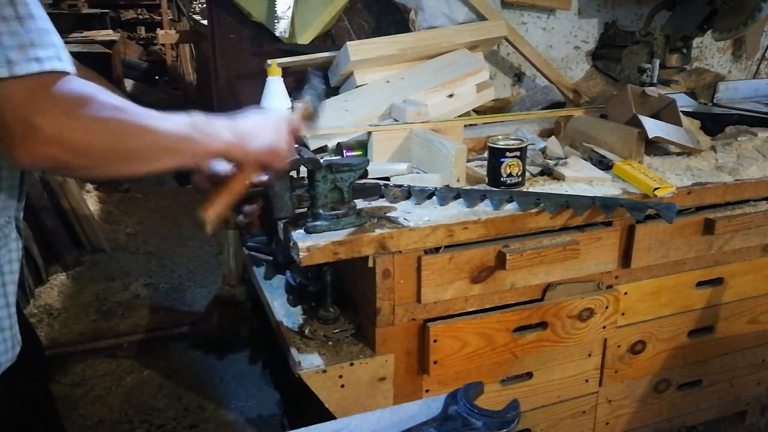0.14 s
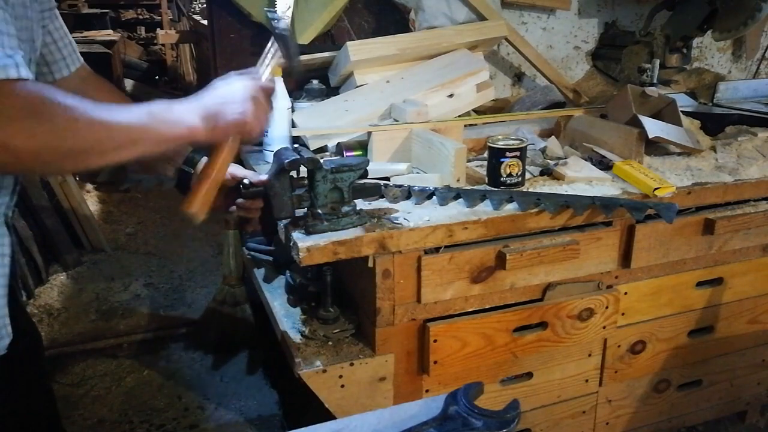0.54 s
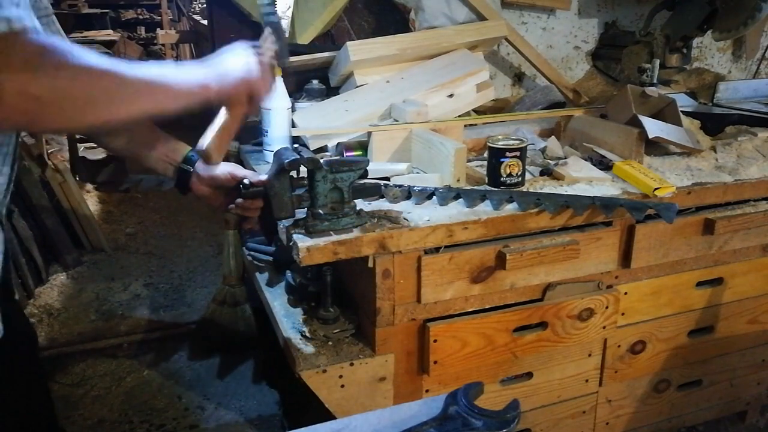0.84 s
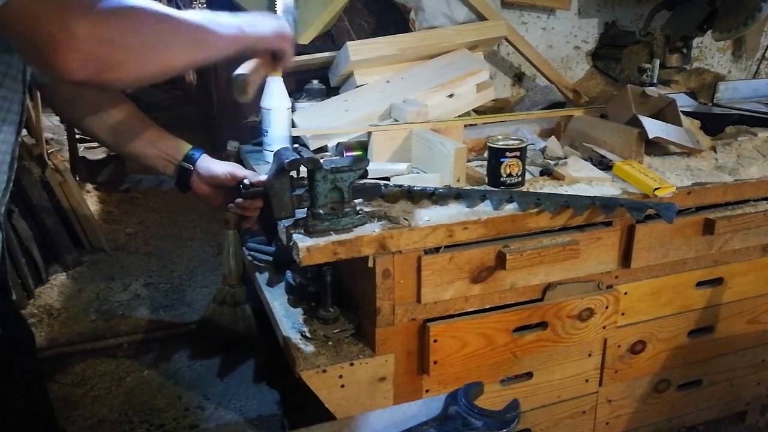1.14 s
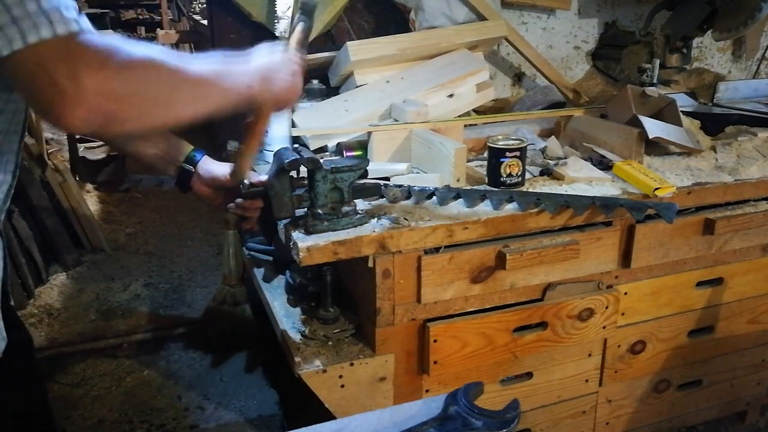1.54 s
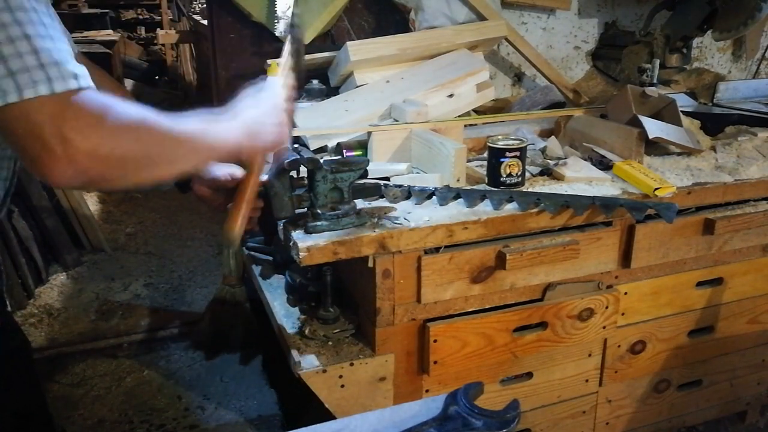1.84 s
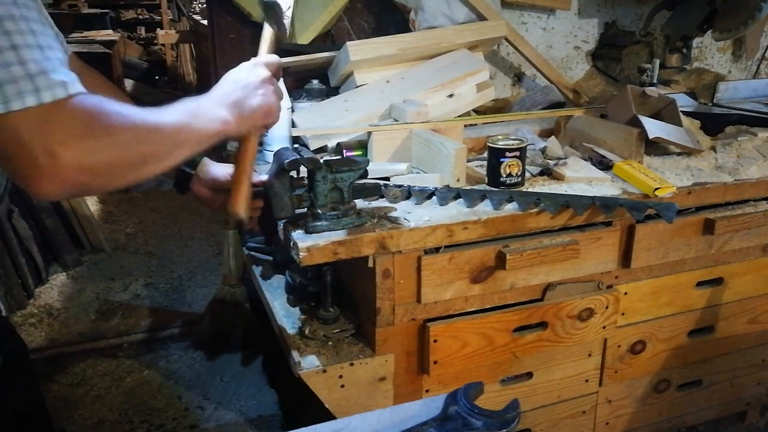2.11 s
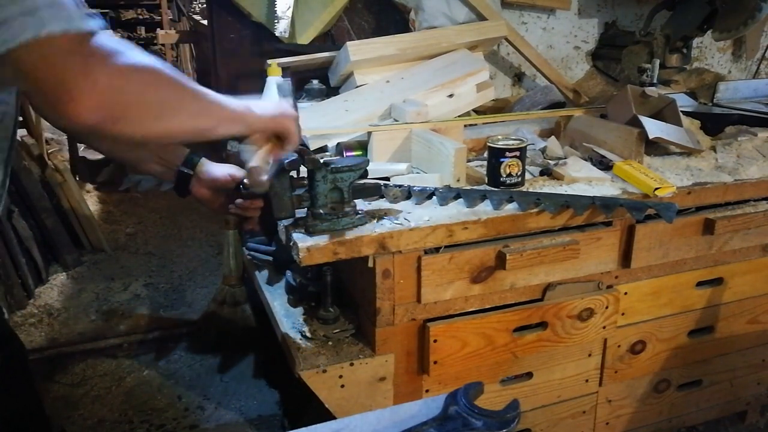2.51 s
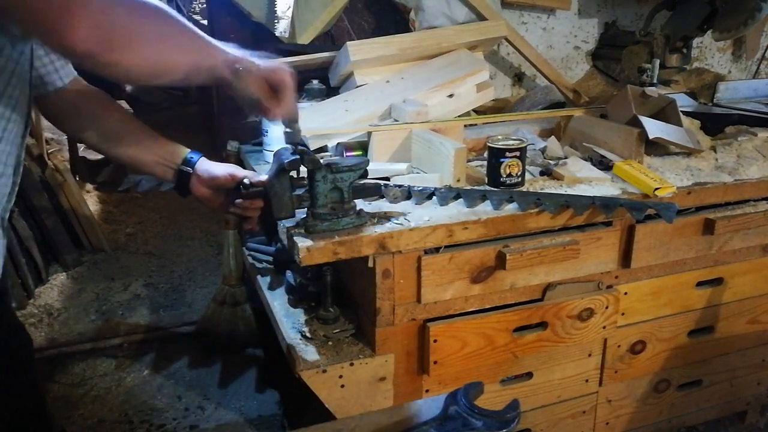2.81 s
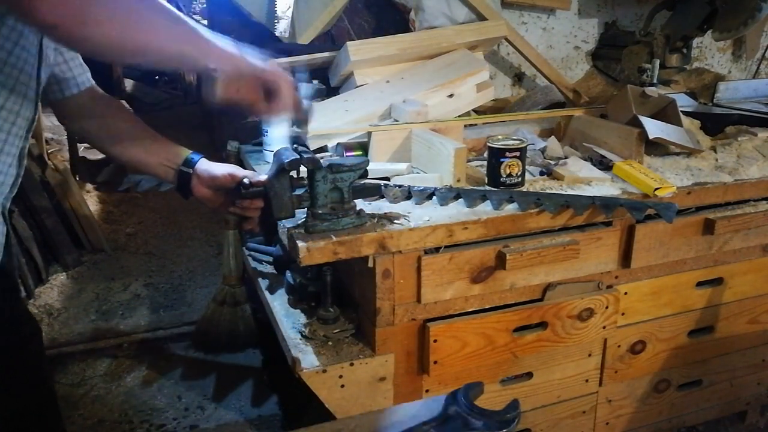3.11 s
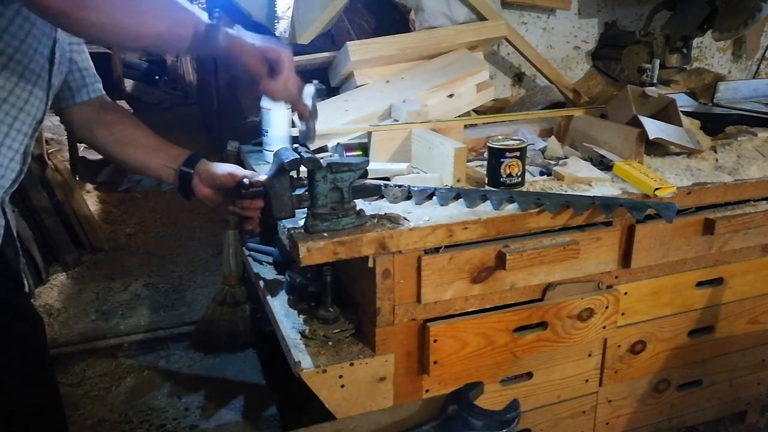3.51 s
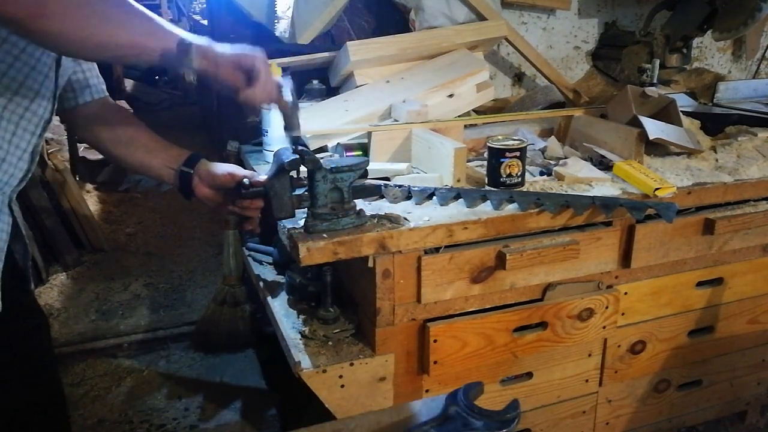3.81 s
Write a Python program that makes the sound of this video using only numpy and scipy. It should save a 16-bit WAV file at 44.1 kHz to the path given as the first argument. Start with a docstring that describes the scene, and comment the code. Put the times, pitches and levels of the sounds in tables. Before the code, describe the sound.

A hammer strikes metal held in a bench vise, about three blows a second. Each is a hard steel crack with a thud, bench clatter and brief ring, sometimes with a quick rebound, heard nearby in a small workshop.

```python
"""Over the faint rumble and hiss of a small workshop, a hand hammer strikes metal held in a bench vise,
about three blows a second. Each impact excites damped modes: first a hard steel crack and a thud,
then a clatter of vise and bench, a brief ring and a dense room tail with a low boom. Early on the work
is handled with two soft knocks, and steel scrapes lightly up to a blow. As the hammering goes on,
the point of contact changes the colour of each blow, and now and then the hammer rebounds."""
import sys
import numpy as np
from scipy import signal
from scipy.io import wavfile
from scipy.ndimage import uniform_filter1d

SR = 44100
rng = np.random.default_rng(int(sys.argv[2]) if len(sys.argv) > 2 else 0)


def dump(signal):
    """Clip the signal to [-1, 1] and save it as 16-bit WAV at the path in sys.argv[1]."""
    limited = np.clip(np.atleast_2d(signal).T, -1, 1)
    pcm = np.round(limited * 32767).astype(np.int16)
    wavfile.write(sys.argv[1], SR, pcm)


N = 174195
THIRD_OCTAVES_HZ = 1000 * 2 ** (np.arange(-15, 13) / 3)
RUN_IN = 4000  # samples for a band filter to settle


def from_db(db):
    """Amplitude ratio of a level in decibels."""
    return 10 ** (np.asarray(db) / 20)


def at_hz(table, hz):
    """Interpolation of each column on a logarithmic frequency axis."""
    frequencies, *columns = np.transpose(table)
    return [np.interp(np.log(hz), np.log(frequencies), column) for column in columns]


def pan(balance_db):
    """Constant-power panning; balance is the level of left over right."""
    gains = from_db([[balance_db / 2], [-balance_db / 2]])
    return gains / np.sqrt(np.mean(gains ** 2))


def envelope(t, rise, t60):
    """Smooth onset and exponential damping, 60 dB in t60 seconds."""
    t = np.maximum(t, 0)
    return (1 - np.exp(-(t / rise) ** 2)) * from_db(-60 * t / t60)


# The sound field at two points. Each row: frequency in Hz, left-right correlation, balance in dB.
STEREO_FIELD = [(60, .99, 0), (150, .97, 0), (280, .7, 0), (550, .0, .3), (1000, .45, 1), (2000, .1, 3),
                (3200, 0, 3), (4600, -.1, 5), (6500, 0, 11), (9000, 0, 12), (15000, .3, 6)]

def band_noise(white, hz):
    """Partial coherence: shared and opposed noise mix to set the correlation of a third octave."""
    sos = signal.butter(2, [hz / 2 ** (1 / 6), hz * 2 ** (1 / 6)], "band", fs=SR, output="sos")
    band = signal.sosfilt(sos, white)[..., RUN_IN:]
    band = band / band.std()
    correlation, balance_db = at_hz(STEREO_FIELD, hz)
    mid = np.sqrt((1 + correlation) / 2) * band[..., :1, :]
    side = np.sqrt((1 - correlation) / 2) * band[..., 1:, :]
    return np.concatenate([mid + side, mid - side], axis=-2) * pan(balance_db)


# The quiet of the workshop. Each row: frequency in Hz, level in dB per third octave.
AMBIENT_SPECTRUM = [(30, -98.5), (70, -77), (130, -95.5), (300, -102), (1000, -97.5), (4000, -96.5),
                    (15000, -106)]

def workshop_ambience():
    """Stationary noise: a faint rumble and hiss, summed band by band."""
    white = rng.standard_normal((2, 2, N + RUN_IN))
    return sum(from_db(at_hz(AMBIENT_SPECTRUM, hz)[0]) * band_noise(white[k % 2], hz)
               for k, hz in enumerate(THIRD_OCTAVES_HZ))


# Hammer contacts, rebounds included. Each row: start in seconds, strength in dB, seven colour gains
# in dB (at COLOUR_HZ), gain of the workpiece ring in dB, gain of the hammer head ring in dB.
BLOWS = [(-.062, -1.5, -1, -2, 1, 2, 3.5, 1.5, -3, -6, 1.5),
         (0.2593, 1.5, -1, 0.5, 1, -0.5, 0.5, 0.5, -7.5, 0.5, 4),
         (.296, -4, -6, -1.5, 0.98, 1.5, -0.5, 0, -6.5, 14, -6.5),
         (0.585, 1.5, -2, -0.5, -0.22, 1.5, 7.5, -2.5, 0, 0.5, 0.5),
         (0.888, 2, -3, 1, -0.97, 2, 2.5, 4.5, -2, -2, 1.5),
         (.939, -11, 1.5, 2.5, -0.53, 4, 4.5, -3.5, -9.5, -0.5, 3.5),
         (1.2114, 0, 2.5, 1, -0.4, 2, 1.5, 6.5, -3.5, -0.5, 1.5),
         (1.5141, 0, 3.5, -1, 0.64, -3.5, 1, 4, -3.5, -7.5, 1),
         (1.544, -10.5, -6.5, -1, -0.57, 7, -1, 4.5, -17, 2.5, 0),
         (1.8167, 4, -7.5, 0.5, 1, -2, -1.5, -1, -9, 3, 0),
         (1.849, -3.5, -2.5, -3, 0.23, 1, -1, -4.5, -9, 8.5, -2.5),
         (2.134, 3.5, -2.5, -1, -1.3, 0, 6, 5.5, 3, -8.5, 0),
         (2.4419, 2, -0.5, 0, -0.94, 4, 7.5, 0.5, 4, -7.5, -6.5),
         (2.7413, 0, -6.5, -0.5, -1.46, 0.5, -0.5, -1.5, -4, 5, -1),
         (3.0471, -.5, 1, 3, -1.6, 2, 0, 5.5, -1, 6.5, 1),
         (3.369, 0.5, -1.5, 1.5, 1, -2.5, 3, -3, 0, 2, 3.5),
         (3.668, 0.5, -0.5, 3.5, .5, -2.5, 3, 1, -1, 1.5, 1.5)]
COLOUR_HZ, NEUTRAL_HZ = [40, 1050, 1600, 3100, 4800, 6800, 11000], [150, 750]

def hammer_blows():
    """Linear superposition: each impact adds its response to the tails of earlier ones."""
    t = np.arange(int(.7 * SR)) / SR
    rings = metal_ring(t)
    responses = steel_crack(t) + bench_thud(t) + clatter_and_room(t) + rings
    out = np.zeros((2, N + 2 * SR))  # a second of margin at each end
    for (start_s, *_), response in zip(BLOWS, responses):
        start = SR + int(start_s * SR)
        out[:, start:start + len(t)] += response
    return out[:, SR:SR + N]


def excitation(hz):
    """Excitation spectrum: force and point of contact set how hard each blow drives a frequency."""
    points_hz = np.array(COLOUR_HZ + NEUTRAL_HZ)
    order = np.argsort(points_hz)
    levels_db = []
    for _, strength_db, *colour_db, _, _ in BLOWS:
        curve_db = np.array(colour_db + [0, 0])[order]
        levels_db.append(strength_db + np.interp(np.log(hz), np.log(points_hz[order]), curve_db))
    return from_db(levels_db)[:, None, None]


def scatter():
    """Random variation: two bounded Gaussian deviates a blow, for pitch and for level."""
    return np.clip(rng.standard_normal((len(BLOWS), 2)), -1.5, 1.5).T[:, :, None, None]


# Modes of the contact. Each row: frequency in Hz, level in dB, t60 in seconds, balance in dB.
CONTACT_MODES = [(770, -24, .016, 0.5), (1000, -20, .018, 0.5), (1340, -18, 0.019, 1),
                 (1915, -20, 0.014, 4), (2764, -20, 0.036, 10), (2980, -18, 0.018, -1.5),
                 (4104, -17.5, .008, 4), (4900, -22, .008, 4), (6240, -17.5, .008, 14.5),
                 (7060, -19, 0.0041, 16.5), (9850, -21.5, .005, 15.5), (13400, -25.5, .004, 9)]
# Returns from near surfaces. Each row: delay in seconds, left gain in dB, right gain in dB.
REFLECTIONS = [(.0028, -9.5, -0.5), (.0072, -6, -2.5), (.0093, -18.5, -11)]

def steel_crack(t, detune=.04, spread_db=1.5):
    """Heavily damped modes shift with the point of contact; early reflections repeat their crack."""
    out, n = np.zeros((len(BLOWS), 2, len(t))), len(t) // 10
    arrival_s = .001038 + np.array([[0], [.0001]])  # later on the right
    direct_path = (0, .0069, .0025)
    for k, (hz, db, t60, balance_db) in enumerate(CONTACT_MODES):
        pitch, level = scatter()
        gain = (-1) ** k * excitation(hz) * from_db(db + spread_db * level) * pan(balance_db)
        for delay, left_db, right_db in [direct_path, *REFLECTIONS]:
            age = np.maximum(t[:n] - arrival_s - delay, 0)
            wave = np.sin(2 * np.pi * hz * (1 + detune * pitch) * age) * from_db(-60 * age / t60)
            out[..., :n] += gain * from_db([[left_db], [right_db]]) * wave
    return out


def bench_thud(t, hz=40):
    """Volume displacement: the bench gives a low thud, scaled by each blow's force and bass colour."""
    push = np.sin(2 * np.pi * hz * t) * envelope(t, rise=.002, t60=.02)
    return from_db(-59) * excitation(hz) ** 2 * push


# Dense response to a blow. Each row: frequency in Hz, then snap, clatter and room tail levels
# in dB per third octave.
DENSE_SPECTRUM = [(30, -67.5, -66.5, -77), (60, -60, -62, -50), (123, -48, -35.5, -43.5),
                  (356, -44.5, -37.5, -38), (500, -43, -31, -37), (630, -40, -39.5, -34.5),
                  (800, -37.5, -41, -38), (1020, -27, -27.5, -30.5), (1610, -26, -24, -29.5),
                  (2200, -27, -27.5, -30), (3000, -27, -19.5, -28.5), (3900, -27.5, -43.5, -34),
                  (4650, -25, -32.5, -37), (6200, -26, -31, -38), (7600, -34, -44, -50.5),
                  (10200, -20.5, -36.5, -44.5), (12700, -28, -46, -50), (16770, -27.5, -41.5, -47.5)]
# Reverberation of the room. Each row: frequency in Hz, t60 in seconds.
ROOM_T60 = [(60, 0.56), (160, 0.29), (420, .31), (1100, 0.32), (2900, 0.29), (4200, .24), (6000, 0.26),
            (9000, 0.24), (15000, 0.096)]
# What all blows have in common. Each row: frequency in Hz, share of power (capped at 0.85 in use).
COMMON_SHARE = [(60, 0.2), (1000, 0.8), (3000, .55), (8000, 1)]
CLATTER_RISE_S, RISE_CYCLES = .0014, 1.5

def clatter_and_room(t):
    """Modal overlap: countless modes of bench, tools and room merge into decaying bands of noise."""
    out, white = 0, rng.standard_normal((len(BLOWS) + 1, 2, 2, len(t) + RUN_IN))
    for k, hz in enumerate(THIRD_OCTAVES_HZ):
        snap_db, clatter_db, room_db = at_hz(DENSE_SPECTRUM, hz)
        build_s = RISE_CYCLES / hz  # low bands build up more slowly
        snap = from_db(snap_db) * envelope(t, rise=.0016 + build_s / 2, t60=.01)
        clatter = from_db(clatter_db) * envelope(t, rise=CLATTER_RISE_S + build_s / 2, t60=.08)
        tail = from_db(room_db) * envelope(t, rise=.0085 + build_s, t60=at_hz(ROOM_T60, hz)[0])
        power = snap ** 2 + clatter ** 2 + tail ** 2
        noise = band_noise(white[:, k % 2], hz)
        common = np.clip(at_hz(COMMON_SHARE, hz)[0], 0, .85)
        band = (np.sqrt(common) * noise[0] + np.sqrt(1 - common) * noise[1:]) * np.sqrt(power)
        band *= np.sqrt(power.sum() / (band ** 2).sum(axis=-1, keepdims=True))  # equal energies
        out = out + band * pan(at_hz(STEREO_FIELD, hz)[1]) * excitation(hz)
    return out


def free_vibration(t, modes, spread_db, detune=.006):
    """Damped sinusoids vary in pitch and level with each blow; none decays slower than the room."""
    out = 0
    for hz, db, t60, balance_db in modes:
        pitch, level = scatter()
        phase = 2 * np.pi * hz * (1 + detune * pitch) * t + rng.uniform(0, 2 * np.pi)
        right_lag = np.arccos(at_hz(STEREO_FIELD, hz)[0])
        wave = np.sin(phase - np.array([[0], [right_lag]]))
        gain = excitation(hz) * from_db(db + spread_db * level) * pan(balance_db)
        decay = envelope(t, CLATTER_RISE_S + RISE_CYCLES / hz, min(t60, at_hz(ROOM_T60, hz)[0]))
        out = out + gain * wave * decay
    return out


# Modes of vise and bench, with the lowest of the room. Each row: frequency in Hz, level in dB,
# t60 in seconds (capped at the room's), balance in dB.
VISE_MODES = [(60.5, -57.5, 0.95, 2.5), (83.6, -48, .6, 1.5), (100.4, -42.5, 0.78, 6),
              (168.94, -39.5, 0.29, -0.5), (260.4, -37.5, 0.49, 2), (550, -36.5, .22, 0),
              (898, -29.5, 0.23, -5), (998, -31, .27, -4.5), (1130, -31, 0.085, 5.5),
              (1432, -39.5, .14, -14.5), (1452, -38.5, 0.34, 3.5), (1904, -35.5, .2, -4.5),
              (1892, -32, 0.35, 2.5), (1895, -32, 0.061, 5), (1998, -29, 0.26, -0.5),
              (2710, -36.5, .16, -0.5), (2953, -32, 0.27, 6.5), (3116, -44.5, 0.12, -10)]
# Modes of the workpiece, with the same columns.
WORKPIECE_MODES = [(1662, -33.5, 0.74, -2), (1663, -41.5, 0.72, -3.5), (2867, -39, 0.2, 3.5),
                   (3370, -45, 0.087, -5)]
# Thin overtones of the hammer head, with the same columns.
HEAD_MODES = [(4732, -47, .17, 4), (4867, -43, .23, 4), (5879, -46, .2, 9), (6025, -44, .23, 9),
              (6185, -45, .2, 9), (6325, -46, .16, 10), (9665, -55, .16, 10), (10950, -55, .16, 10),
              (12400, -57, .16, 8), (15000, -55, .17, 4)]

def metal_ring(t):
    """Normal modes: after the impact, vise, workpiece and hammer head ring at their own frequencies."""
    workpiece_gain, head_gain = from_db(np.array(BLOWS).T[-2:, :, None, None])
    vise = free_vibration(t, VISE_MODES, spread_db=.5)
    workpiece = free_vibration(t, WORKPIECE_MODES, spread_db=.5)
    head = free_vibration(t, HEAD_MODES, spread_db=3)
    return vise + workpiece_gain * workpiece + head_gain * head


# Handling of the work. Each row: start in seconds, level in dB.
KNOCKS = [(0.149, -50.5), (.192, -62)]

def handling_knocks(hz=230):
    """Soft impacts excite mainly low frequencies: dull, quickly damped bursts of noise."""
    t = np.arange(N) / SR
    sos = signal.butter(2, [hz / 2, hz * 1.6], "band", fs=SR, output="sos")
    noise = signal.sosfilt(sos, rng.standard_normal(N))
    bursts = sum(from_db(db) * envelope(t - start, rise=.0061, t60=.12) for start, db in KNOCKS)
    return noise / noise.std() * bursts


# Resonances of the sliding steel. Each row: frequency in Hz, level in dB at the top of the swell.
SCRAPE_RESONANCES = [(4950, -70), (9500, -73), (10700, -73)]

def steel_scrape(start_s=.51, end_s=.585, q=12):
    """Sliding friction: steel on steel drives three resonances with noise that swells up to a blow."""
    out, swell = 0, np.interp(np.arange(N) / SR, [start_s, end_s], [0, 1], right=0)
    for hz, db in SCRAPE_RESONANCES:
        sos = signal.butter(2, [hz * (1 - .5 / q), hz * (1 + .5 / q)], "band", fs=SR, output="sos")
        noise = signal.sosfilt(sos, rng.standard_normal((2, N)))
        out = out + from_db(db) * noise / noise.std() * pan(at_hz(STEREO_FIELD, hz)[1])
    return out * swell


def scene():
    """Superposition: hammering, handling and the quiet of the room add as pressures."""
    return hammer_blows() + handling_knocks() + steel_scrape() + workshop_ambience()


def expander(x, above_hz=400, window_s=.02, threshold_db=-58, slope=.59, max_cut_db=7):
    """Downward expansion: above the bass, gain sinks at levels under a threshold, shortening tails."""
    upper = signal.sosfiltfilt(signal.butter(2, above_hz, "high", fs=SR, output="sos"), x)
    power = uniform_filter1d(np.mean(upper ** 2, axis=0), int(window_s * SR))
    level_db = 10 * np.log10(np.abs(power) + 1e-18)
    cut_db = np.clip(slope * (threshold_db - level_db), 0, max_cut_db)
    return x - upper * (1 - from_db(-cut_db))


def record(dry):
    """Expansion lowers quiet passages, saturation rounds peaks, a steep low-pass limits the band."""
    low_pass = signal.ellip(10, .2, 80, 15900, fs=SR, output="sos")
    return signal.sosfilt(low_pass, np.tanh(expander(dry)))


dry = scene()
out = record(dry)
dump(out)
```